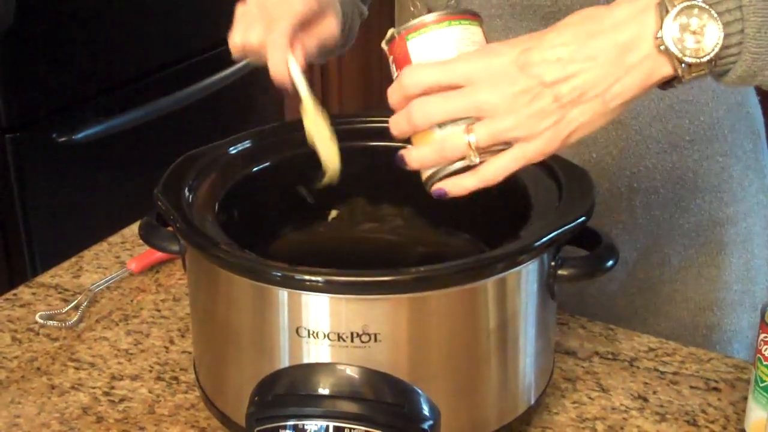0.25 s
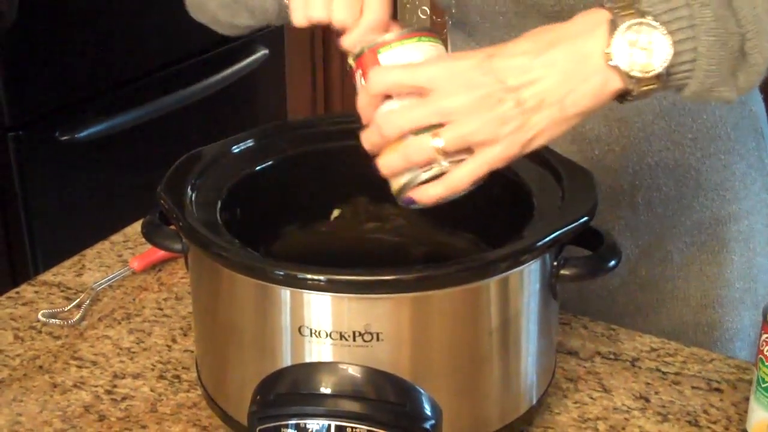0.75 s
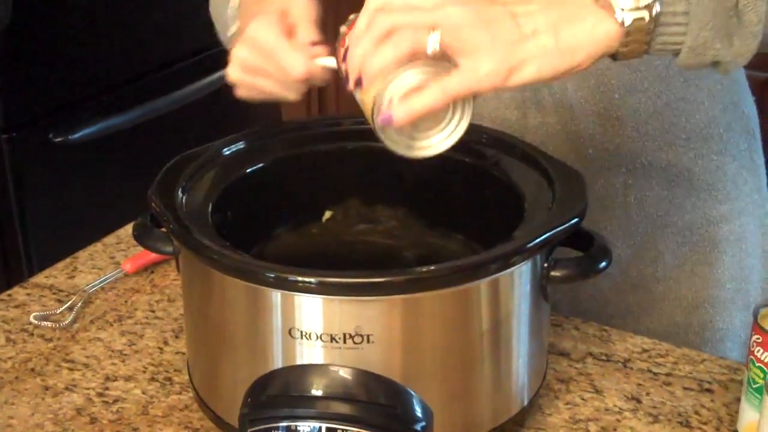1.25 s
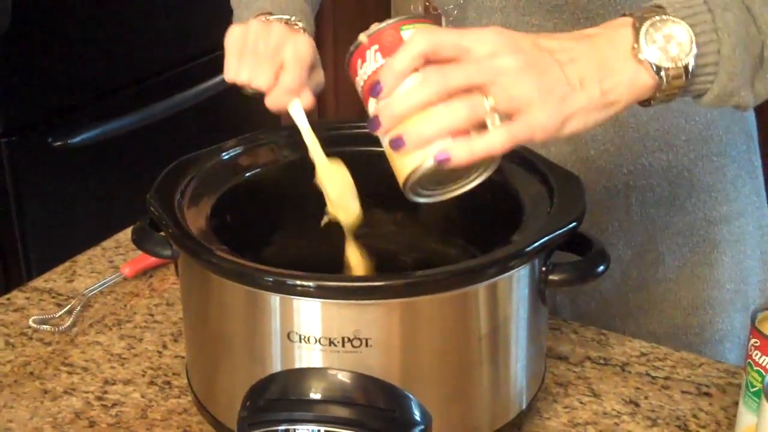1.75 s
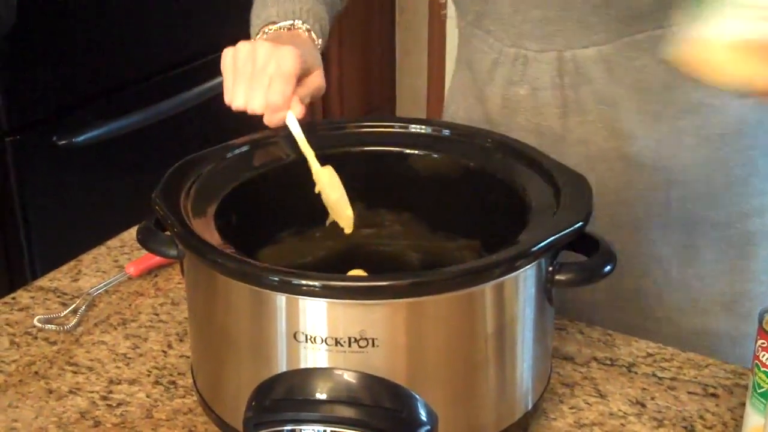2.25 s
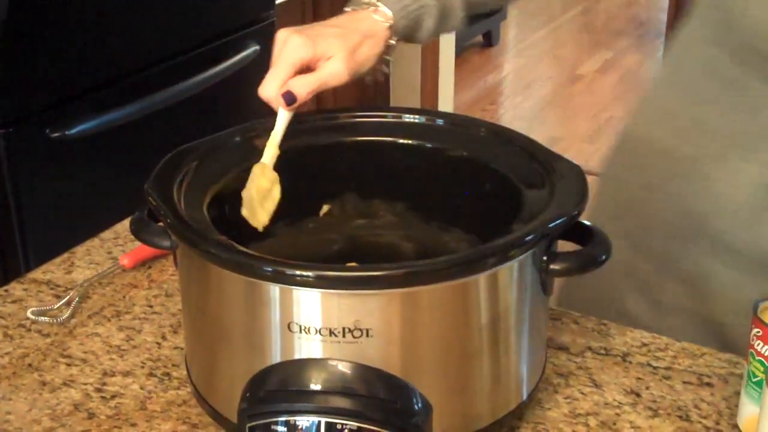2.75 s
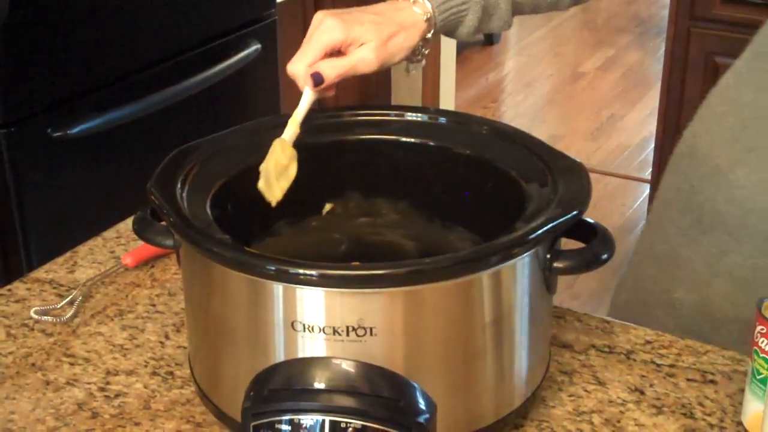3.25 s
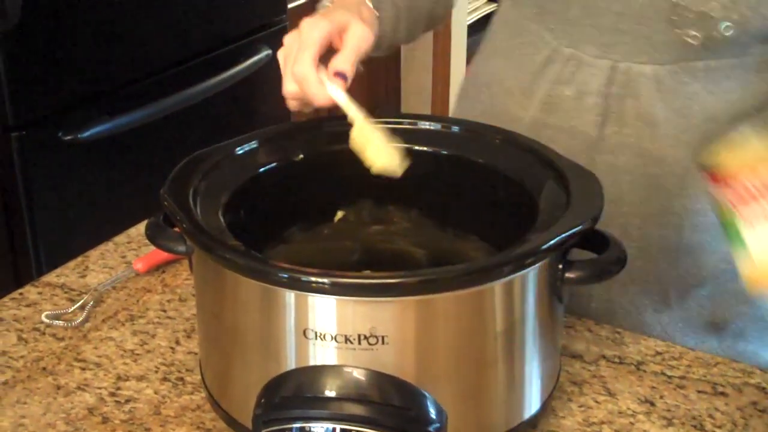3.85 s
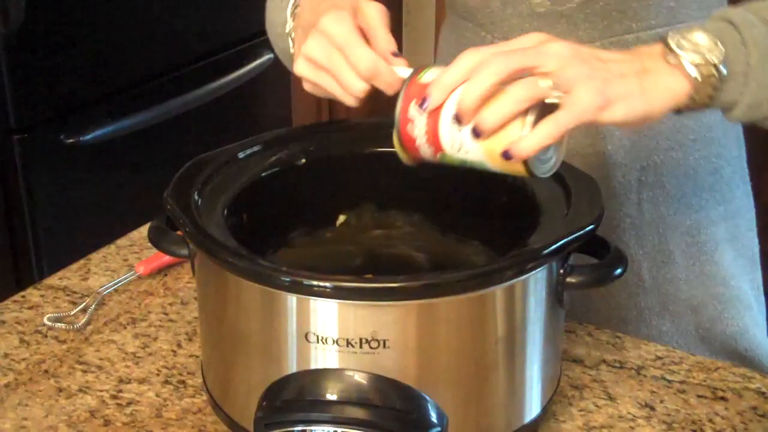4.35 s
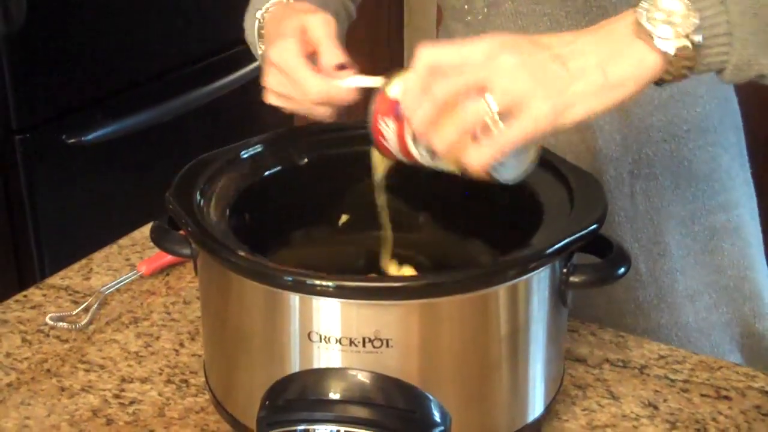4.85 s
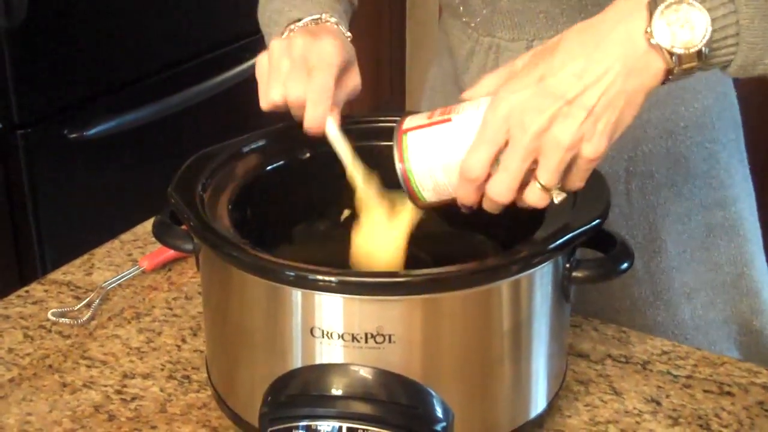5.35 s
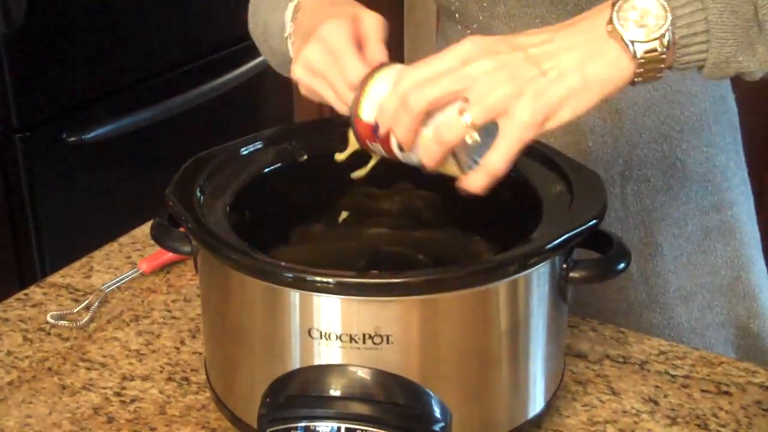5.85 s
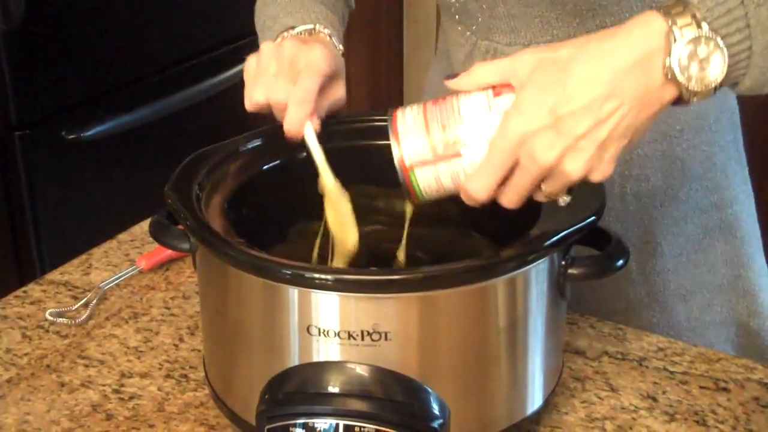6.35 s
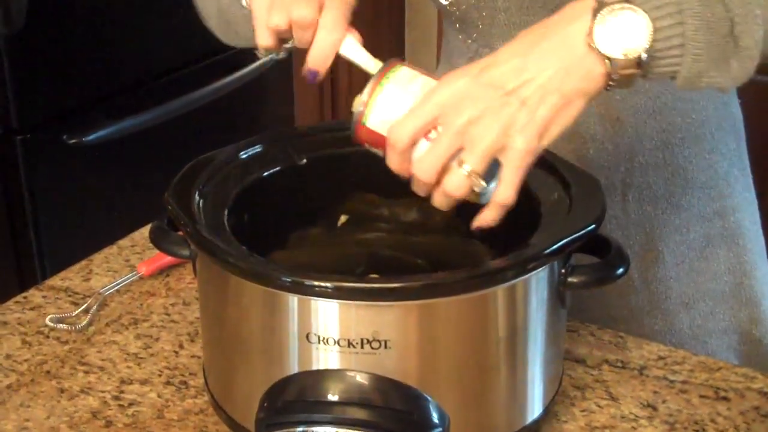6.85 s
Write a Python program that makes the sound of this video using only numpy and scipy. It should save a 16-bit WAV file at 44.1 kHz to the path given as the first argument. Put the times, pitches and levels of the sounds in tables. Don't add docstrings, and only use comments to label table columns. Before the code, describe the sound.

In a quiet kitchen, a spatula knocks a held can three times, a can clanks onto the counter, and another is scraped out wetly.

```python
import sys
import numpy as np
from scipy import signal
from scipy.fft import rfft, irfft, next_fast_len
from scipy.io import wavfile
from scipy.ndimage import map_coordinates

SR = 44100
rng = np.random.default_rng(int(sys.argv[2]) if len(sys.argv) > 2 else 0)


def master_out(mix):
    frames = np.transpose(np.atleast_2d(mix))
    ceiling = np.clip(frames, -1, 1)
    pcm = np.round(ceiling * 32767).astype(np.int16)
    wavfile.write(sys.argv[1], SR, pcm)


def amplitude_ratio(level_db):
    exponent = np.asarray(level_db, float) / 20
    return 10 ** exponent


N = 312669


def unit(x):
    return x / np.sqrt(np.mean(x ** 2) + 1e-20)


def peak_unit(x):
    return x / abs(x).max()


def along(points, hz):
    f, v = np.transpose(points)
    return np.interp(np.log(hz + 1), np.log(f + 1), v)


def filtered(x, response):
    m = next_fast_len(len(x) + 8192)
    return irfft(rfft(x, m) * response(np.fft.rfftfreq(m, 1 / SR)), m)[:len(x)]


def resonant(x, peaks):
    def response(f):
        total = 0
        for k, (hz, width, db) in enumerate(peaks):
            loss = 1j * f * width
            total = total + (-1) ** k * amplitude_ratio(db) * loss / (hz * hz - f * f + loss)
        return total
    return filtered(x, response)


def hiss(spectrum):
    return unit(filtered(rng.standard_normal(N), lambda hz: amplitude_ratio(along(spectrum, hz))))


def grit(spread_db, rate_hz):
    sizes = rng.standard_normal(int(N * rate_hz / SR) + 4)
    size = map_coordinates(sizes, [np.arange(N) * rate_hz / SR], order=1)
    return rng.standard_normal(N) * amplitude_ratio(spread_db * size)


def dying(fade, colour_db):
    hz, t, z = signal.stft(rng.standard_normal(SR // 2), SR, nperseg=128)
    level_db = colour_db(hz)[:, None] - 60 * t / along(fade, hz)[:, None]
    tail = signal.istft(z * amplitude_ratio(level_db), SR, nperseg=128)[1]
    return tail / np.linalg.norm(tail)


def ring(modes, scatter_db=3.0, tilt_db=0, wander=0.00081, free=1):
    t = np.arange(SR // 2) / SR
    total = np.zeros(len(t))
    for hz, db, t60_s in modes:
        steps = np.repeat(rng.standard_normal(len(t) // 200 + 1), 200)[:len(t)]
        drift_s = wander * np.cumsum(steps) / SR
        start_db = db + tilt_db * np.log2(hz / 3000) + scatter_db * rng.normal()
        tone = np.sin(2 * np.pi * (hz * (t + drift_s) + rng.random()))
        total += amplitude_ratio(start_db - 60 * t / (free * t60_s)) * tone
    return total * (1 - np.exp(-t / 0.0019))


def swell(start_s, length_s, first_db, last_db, rise, fall):
    step = 8
    t = np.arange(0, N, step) / SR - start_s
    db = np.interp(t, [0, length_s], [first_db, last_db])
    db += abs(rise) * np.minimum(t, 0) - abs(fall) * np.maximum(t - length_s, 0)
    return np.repeat(amplitude_ratio(db), step)[:N]


def add(track, s, sound):
    part = track[round(s * SR):][:len(sound)]
    part += sound[:len(part)]


def room(x, wet_db, dull_db=0):
    # (frequency [Hz], t60 [s])
    echo_fade = [(200, 0.3), (1000, 0.56), (4000, 0.41), (12000, 0.32)]
    tail = dying(echo_fade, lambda hz: -dull_db * np.log2(1 + (hz / 5000) ** 2))
    tail = np.pad(tail, (250, 0))
    return x[:N] + amplitude_ratio(wet_db) * signal.fftconvolve(x, tail)[:N]


def raps():
    # (time [s], peak [dB], thud [dB], brightness [dB per octave], freedom to ring [0-1])
    blows = [
        (0.0915, -53.5, -2.5, 8, 0.8),
        (1.9285, -11, -20.5, 1, 0.62),
        (2.0819, -10, -24.5, 1.5, 0.58),
        (2.2088, -8.5, -23, 1.5, 0.52),
        (2.3575, -35.5, -22, -10, 0.18),
        (2.596, -41, -11.5, 0, 0.07),
    ]
    wall_hz = [824, 1050, 2255, 2614, 2870, 2976, 3021, 3199, 3570, 3653, 3860, 3970, 4710, 5254, 5450,
               6045, 6440, 6822, 7646, 8524, 9302, 9710, 10550, 11200, 11660, 8805, 10005, 12780]
    # (level [dB], t60 [s])
    wall_ring = [(-6.5, 0.084), (-8, 0.059), (6.5, 0.078), (-1.5, 0.12), (-5.5, 0.2), (-6, 0.25),
                 (-0.5, 0.049), (-3.5, 0.45), (-7.5, 0.2), (-5, 0.13), (6.5, 0.05), (2.5, 0.061),
                 (8.5, 0.038), (-4.5, 0.1), (-13.5, 0.16), (-16.5, 0.15), (-24.5, 0.1), (-15.5, 0.2),
                 (-10, 0.13), (-23.5, 0.39), (-27.5, 0.45), (-39.5, 0.32), (-35, 0.44), (-26, 0.39),
                 (-27, 0.096), (-33.5, 0.536), (-30, 0.2), (-35, 0.27)]
    # (frequency [Hz], level [dB per Hz])
    wash_colour = [(350, -49), (600, -6), (812, -9), (1990, -10), (2210, -2), (2460, -4.5), (3600, 1),
                   (4330, -10), (6100, -11), (7240, -20), (7840, -11.5), (8160, -11.5), (11500, -19),
                   (14000, -28)]
    # (frequency [Hz], t60 [s])
    wash_fade = [(700, 0.25), (3000, 0.09), (6000, 0.21), (8000, 0.031), (12000, 0.025)]
    end_hz = [165, 250, 310, 356, 410, 470]
    # (level [dB], t60 [s])
    end_ring = [(-5, 0.09), (-7, 0.045), (-1, 0.07), (0, 0.33), (-3, 0.07), (-9, 0.12)]
    track = np.zeros(N)
    wall, end = np.c_[wall_hz, wall_ring], np.c_[end_hz, end_ring]
    for s, db, thud_db, tilt_db, free in blows:
        wash = dying(wash_fade, lambda hz: along(wash_colour, hz) + tilt_db * np.log2(hz / 3000 + 0.011))
        tin = ring(wall, scatter_db=2.15, wander=0.0005, tilt_db=tilt_db, free=np.clip(free, 0.1, 2))
        thud = ring(end, wander=0.015)
        blow = amplitude_ratio(db - 14) * tin + amplitude_ratio(db + 11.5) * wash[:SR // 2] + amplitude_ratio(db + thud_db - 2) * thud
        add(track, s - 0.001, blow)
    track = filtered(track, lambda hz: 1 / (1 + (140 / (hz + 1)) ** 6))
    return room(track, wet_db=-8.5, dull_db=1)


def set_down():
    # (time [s], peak [dB])
    landings = [
        (3.054, -10.5),
    ]
    # (frequency [Hz], level [dB], t60 [s])
    rock = [(1470, -29, 0.15), (1974, -16, 0.12), (2550, -23, 0.22), (3230, -23.5, 0.2), (4043, -17.5, .08)]
    empty_hz = [670, 735, 830, 870, 934, 963, 1480, 1954, 2482, 2573, 2697, 3025, 3225, 3370, 3445, 3526,
                3811, 4043, 4947, 5017, 5222, 6024, 8188, 8436, 10000, 11510]
    # (level [dB], t60 [s])
    empty_ring = [(-11.5, 0.28), (8.5, 0.085), (-6, 0.15), (-11.5, 0.096), (1.5, 0.14), (-33, 0.24),
                  (-44, 0.41), (-17.5, 0.3), (0, 0.063), (-5.5, 0.067), (-10.5, 0.16), (-27, 0.18),
                  (-21.5, 0.314), (-7, 0.069), (-19, 0.14), (-32, 0.13), (-7, 0.08), (-28, 0.4),
                  (-1.5, 0.083), (-19, 0.3), (-24, 0.32), (-19, 0.08), (-10, 0.078), (-22, 0.12),
                  (-49, 0.13), (-14, 0.044)]
    # (frequency [Hz], level [dB per Hz])
    wash_colour = [(29, -81.5), (50, -70), (609, -39.5), (735, -1), (845, -14), (940, -5), (1120, -26.5),
                   (1980, -14.5), (2200, -16.5), (2550, -9), (2950, -31), (3300, -9), (3650, -24.5),
                   (3920, 0), (4510, -25.5), (5080, -14.5), (7070, -28), (8330, -16), (14000, -26.5)]
    # (frequency [Hz], t60 [s])
    wash_fade = [(100, 0.095), (800, 0.13), (3000, 0.22), (7000, 0.082), (12000, 0.0665)]
    # (frequency [Hz], level [dB], t60 [s])
    counter = [(64.7, -39, 0.038), (120, -70, 0.061)]
    track, rock_delay_s = np.zeros(N), 0.018
    highpass = signal.butter(3, 480, "high", fs=SR, output="sos")
    for s, db in landings:
        wash = dying(wash_fade, lambda hz: along(wash_colour, hz))[:SR // 2]
        tin = ring(np.c_[empty_hz, empty_ring], scatter_db=0, wander=0.0012, free=0.8)
        tin = signal.sosfilt(highpass, tin)
        add(track, s, amplitude_ratio(db - 7.5) * tin + amplitude_ratio(db + 11.5) * wash + amplitude_ratio(db) * ring(counter))
        add(track, s + rock_delay_s, amplitude_ratio(db) * ring(rock, scatter_db=0, wander=0.002))
    return room(track, wet_db=-6)


def ticks():
    # (time [s], peak [dB], snap [Hz])
    clicks = [(.1983, -54, 11100), (.238, -56, 9400), (0.36, -49, 13000), (0.467, -60, 7540),
              (.7186, -60, 12070), (0.78, -54.5, 7700), (.865, -57, 9370), (1.098, -48.5, 12620),
              (1.438, -48, 12350), (1.455, -52, 10200), (1.6889, -57.5, 13040), (1.71, -72, 10010),
              (1.728, -45.5, 11230), (1.744, -46, 10290), (1.8931, -51, 8150), (2.369, -49.5, 10840),
              (2.7912, -53.5, 5280), (3.224, -51, 6680), (3.4352, -54.5, 6000), (3.714, -51.5, 8100),
              (3.872, -57.5, 10000), (3.957, -47, 10000),
              (4.209, -66, 11900), (4.287, -64, 7900), (4.341, -56, 10000), (4.766, -57, 12000),
                   (4.78, -31.5, 9570), (4.7845, -31, 10660), (4.898, -49, 12500), (4.9047, -39, 9000),
                   (4.9397, -44, 8330), (5.0363, -56, 11500), (5.06, -53, 12000), (5.083, -61, 9800),
                   (5.098, -59, 11000), (5.1944, -42, 13540), (5.4256, -47, 10800), (5.637, -51.5, 11500),
                   (5.7425, -52, 10900), (5.7981, -65.5, 10700), (5.818, -47, 11640), (5.8278, -51, 11140),
                   (5.91, -39, 10850), (5.9153, -38.5, 10200), (6.2105, -31, 7940), (6.431, -50, 13000),
                   (6.524, -46.5, 13500), (6.9424, -35, 8800), (7.049, -50, 8700), (7.059, -51.5, 9450)]
    # (time [s], peak [dB], snap [Hz], slap [dB], t60 [s])
    slaps = [(0.7406, -49, 11860, -9.5, 0.021), (0.8823, -60.5, 5590, -3.5, 0.02),
             (4.6313, -46.5, 6400, -11, 0.016), (4.7008, -54, 9550, -14, 0.021),
             (4.7751, -40, 9840, -10.5, 0.06), (4.8717, -43, 8400, -21, .036),
             (5.8936, -62.5, 10070, -4.5, 0.018), (6.024, -51.5, 4300, -1, 0.02),
             (6.9349, -33, 8650, -15.5, 0.027), (6.9928, -46, 9500, -9.5, 0.025)]
    # (time [s], peak [dB], snap [Hz], tin ring [dB], t60 [s])
    nudges = [(0.639, -55, 4470, -0.5, 0.024), (1.02, -41.5, 11000, -15, 0.019),
              (1.133, -45.5, 6500, 2.5, 0.017), (2.951, -63.5, 5040, 5.5, 0.025),
              (4.419, -52.5, 7460, -5.5, 0.031), (4.4535, -53, 11400, -4, .013),
              (5.3686, -52, 12500, -10, 0.011), (5.9532, -50.5, 9600, -11, 0.015),
              (6.573, -45.5, 6800, -1.5, 0.028), (6.913, -55, 10440, -10, 0.0075),
              (7.073, -50, 9000, -5, 0.0074)]
    # (time [s], peak [dB], frequency [Hz], width [Hz], t60
    # [s])
    pings = [(0, -62.5, 2480, 55, 0.47), (.09, -57, 2220, 120, 0.12), (0.091, -65, 5778, 150, .071),
             (1.022, -49.5, 900, 432, 0.11), (2.36, -51, 188, 43.2, 0.055),
             (2.597, -56.5, 187.4, 64.8, 0.057), (4.458, -40, 1400, 370, 0.036),
             (4.582, -55, 3840, 160, 0.1), (4.66, -57.5, 556, 80, 0.29), (4.778, -43, 4260, 300, .03),
             (4.779, -46, 2890, 250, .04), (4.781, -46, 1000, 180, 0.057), (4.872, -37.5, 2930, 860, 0.09),
             (4.873, -49.5, 1600, 470, 0.12), (4.874, -45, 7760, 400, 0.2), (6.024, -45, 3650, 300, 0.027),
             (6.21, -36, 2500, 2500, 0.017), (6.211, -38, 5360, 200, .05), (6.213, -40, 690, 25.8, 0.048),
             (5.5, -54, 6300, 150, 0.16), (6.5, -52.5, 5100, 300, 0.054), (6.573, -52, 1440, 276.5, 0.053),
             (6.574, -44.5, 6710, 201, 0.03), (7, -57, 1980, 400, 0.027)]
    # (frequency [Hz], width [Hz], level [dB])
    blade = [(3440, 1170, -8), (4070, 1460, -6.5)]
    # (frequency [Hz], width [Hz], level [dB])
    held = [(1321, 500, -11), (2130, 273, -4), (2710, 360, -3.5)]
    spots = np.zeros((3, N))
    t = np.arange(SR // 5) / SR

    def burst(t60_s):
        return rng.standard_normal(len(t)) * amplitude_ratio(-60 * t / np.clip(t60_s, 0.002, 0.4))

    # (time s, peak dB, snap Hz, slap dB, tin dB, t60 s)
    contacts = [(s, db, hz, -22, -23, 0.013) for s, db, hz in clicks]
    contacts += [(s, db, hz, slap_db, slap_db, t60_s) for s, db, hz, slap_db, t60_s in slaps]
    contacts += [(s, db, hz, tin_db - 8.5, tin_db, t60_s) for s, db, hz, tin_db, t60_s in nudges]
    for k, (s, db, hz, slap_db, tin_db, t60_s) in enumerate(contacts):
        snap = resonant(resonant(burst(t60_s), [(hz, 0.35 * hz, 0)]), [(hz, 2 * hz, 0)])
        slap = amplitude_ratio(slap_db + 7) * peak_unit(resonant(burst(t60_s), blade))
        tin = amplitude_ratio(tin_db) * peak_unit(resonant(burst(t60_s), held))
        add(spots[k % len(spots)], s, amplitude_ratio(db + 4) * (peak_unit(snap) + slap + tin))
    for s, db, hz, width_hz, t60_s in pings:
        note = resonant(resonant(burst(t60_s), [(hz, width_hz, 0)]), [(hz, 3 * width_hz, 0)])
        add(spots[0], s, amplitude_ratio(db) * peak_unit(note))
    return filtered(sum(room(x, wet_db=-5.5) for x in spots), lambda hz: 1 / (1 + (hz / 14030) ** 6))


def rim_clip():
    # (frequency [Hz], level [dB], t60 [s])
    rim = [(1600, -46, .03), (1970, -39.5, 0.037), (2245, -38, 0.06), (2450, -48.5, 0.085),
           (2540, -32, 0.035), (2990, -40.5, .03), (4140, -56, .1), (5200, -50, 0.058), (6400, -54, 0.043)]
    track = np.zeros(N)
    add(track, 1.1325, ring(rim, scatter_db=0, wander=0.003))
    return room(track, wet_db=-7.5)


def scrapes():
    # (start [s], length [s], first level [dB], last level [dB], release [dB per s])
    strokes = [
        (4.422, 0.03, -52.5, -56, 697),
        (4.453, 0.018, -51.5, -59.5, 255),
        (5.225, 0.054, -50.5, -43, 698),
        (6.029, 0.07, -42.5, -48, 249.5),
        (6.111, 0.037, -48, -45.5, 502),
        (6.163, 0.024, -38.5, -41, 420),
    ]
    # (frequency [Hz], width [Hz], level [dB])
    walls = [
        [(1600, 33, 8), (1750, 7.5, 11), (2060, 19, 15), (3660, 21, 3)],
        [(1210, 34, 11), (1760, 16, -8), (3250, 530, 4), (5400, 33, -13), (6000, 27, -26)],
        [(1390, 125, -6), (2276, 25, -1.5), (2700, 82, -7.5), (3230, 95, -10), (3800, 67, -9.5),
         (4300, 27, -8.5), (5150, 990, -23)],
        [(1420, 460, 4.5), (2345, 9.8, 16.5), (3130, 34, -1), (3340, 33, -3), (3600, 230, 7.5), (4130, 28, -14),
         (4330, 23, -16)],
        [(1270, 173, -17), (1760, 79, -13.5), (2366, 56, -4), (3300, 79, -12.5), (3380, 230, -17),
         (4000, 380, -18.5), (4370, 22, -23)],
        [(1300, 180, -22), (1700, 160, -19.5), (2525, 21, -5), (3340, 300, -24.5), (3850, 170, -21)],
    ]
    # (start [s], length [s], first level [dB], last level [dB], release [dB per s])
    hollow = [
        (5.23, .045, -76, -68, 60),
        (6.026, 0.054, -62, -58, 300),
        (6.124, 0.037, -54.5, -54, 300),
        (6.19, 0.015, -53, -49, 300),
    ]
    # (frequency [Hz], width [Hz], level [dB])
    cavity = [(690, 47, 0)]

    def stroke(start_s, length_s, first_db, last_db, release):
        return swell(start_s, length_s, first_db, last_db, 2500, release)

    grains = grit(spread_db=1.5, rate_hz=900)
    air = unit(resonant(resonant(rng.standard_normal(N), cavity), cavity))
    tin = np.zeros(N)
    for row, wall in zip(strokes, walls):
        widened = [(hz, width_hz + 60, db) for hz, width_hz, db in wall]
        tin += stroke(*row) * unit(resonant(grains, widened))
    return room(amplitude_ratio(-2) * tin, wet_db=-10.5) + sum(stroke(*row) for row in hollow) * air


def smear():
    # (peak time [s], hiss [dB], swell [dB per s], fade [dB per s], slurp against hiss [dB])
    peels = [(.088, -64, 505, 68, -25), (.358, -76, 1194, 700, -21), (.464, -73, 1800, 302, -27),
             (.756, -67.5, 130, 97.5, -21), (1.02, -62.5, 1502, 450, -20), (1.132, -54, 400, 119, -20),
             (1.438, -57, 700, 320, -29), (1.735, -54, 300, 191.5, -24.5), (4.422, -74.5, 1786, 81, -34),
             (4.64, -59, 68.5, 150.5, -12.5), (4.78, -46.5, 1702, 282.5, -43),
             (4.874, -47.5, 1600, 149, -40), (5.27, -55, 159, 224, -27), (5.43, -82, 1799, 233, -27.5),
             (5.83, -96.5, 64.5, 400, -43.5), (5.92, -56.5, 704, 498, -21), (6.19, -53.5, 37, 392, -29.5),
             (6.21, -43, 1303, 355, -12), (6.58, -55.5, 797, 65, -27), (6.931, -57, 1799, 319.5, -36),
             (6.99, -76.5, 300, 58, 3)]
    # (frequency [Hz], level [dB per Hz])
    hiss_colour = [(2500, -54), (6000, -15.5), (9000, -2.5), (13000, -4.5), (15000, -17.5)]
    # (frequency [Hz], level [dB per Hz])
    slurp_colour = [(1000, -30.5), (2500, -6), (6000, -7), (9000, -27.5)]
    crackle = grit(spread_db=3.5, rate_hz=810)
    fine = unit(filtered(crackle, lambda hz: amplitude_ratio(along(hiss_colour, hz))))
    high, low = np.zeros((2, N))
    for s, db, rise, fall, slurp_db in peels:
        high += swell(s, 0, db, db, rise, fall)
        low += swell(s, 0, db + slurp_db, db + slurp_db, 0.13 * rise, 0.37 * fall)
    return high * amplitude_ratio(-7) * fine + low * hiss(slurp_colour)


def kitchen():
    # (frequency [Hz], level [dB per Hz])
    air_colour = [(12, -29), (20, -4), (32, -12.5), (172, -18.5), (214, -15), (403, -18.5), (476, -15.5),
                  (593, -16), (644, -18), (700, -16.5), (1320, -18.5), (5090, -32), (5840, -33),
                  (12300, -33), (14500, -46.5)]
    # (frequency [Hz], level [dB])
    motor = [(403.7, -77.5), (452.2, -104), (699.8, -79), (1308, -90.5), (1357, -79.5), (1954, -89.5)]
    hum = resonant(rng.standard_normal(N), [(hz, 6, db + 33.5) for hz, db in motor])
    return amplitude_ratio(-65) * hiss(air_colour) + hum


def scene():
    return (raps() + set_down() + ticks() + rim_clip() + scrapes() + smear() + kitchen())[None]


def roll_off(x):
    return signal.sosfilt(signal.butter(12, 14770, fs=SR, output="sos"), x)


def record(dry):
    top_hz, shelf_hz, offset = 14000, 770, -0.0005

    def band(hz):
        return np.where(hz < top_hz, 1, amplitude_ratio(-22) * (hz < top_hz + shelf_hz))

    sound = filtered(dry[0], band)[None]
    return roll_off(sound + offset)


dry = scene()
out = record(dry)
master_out(out)
```